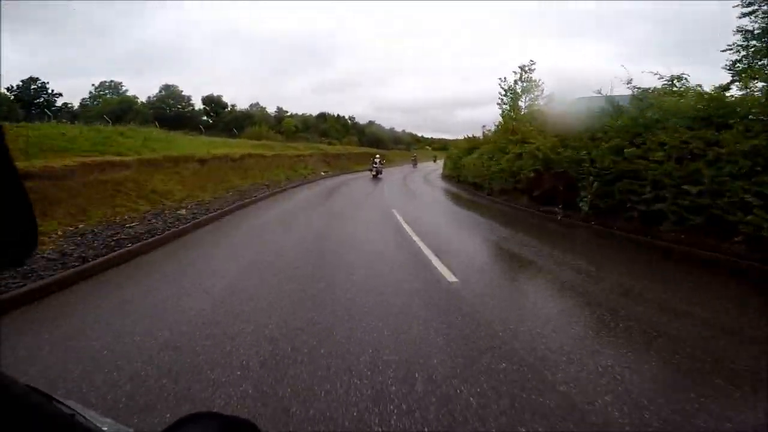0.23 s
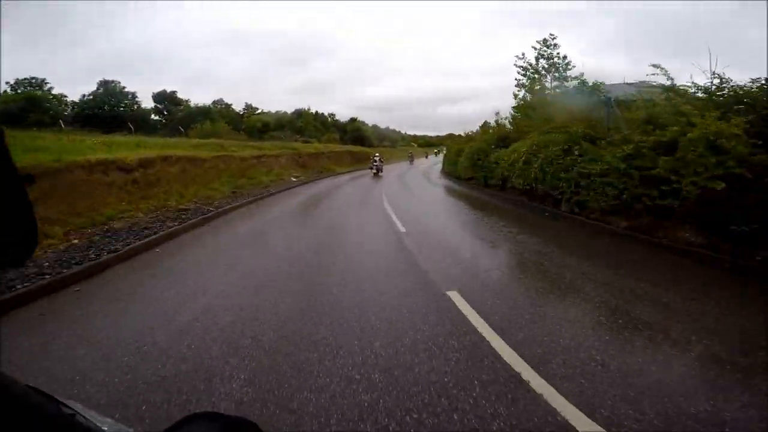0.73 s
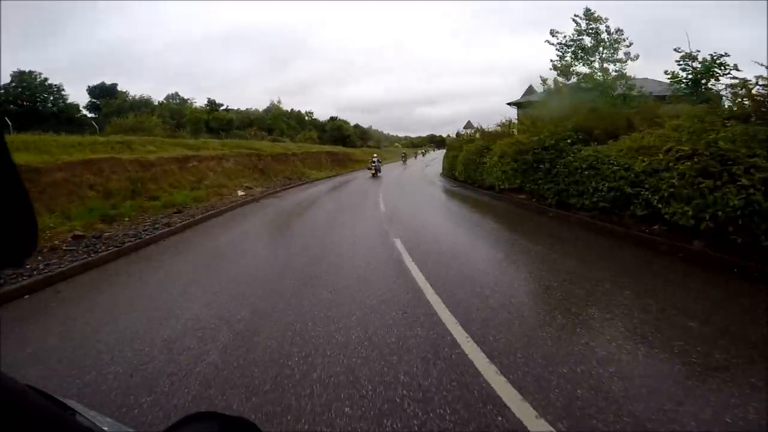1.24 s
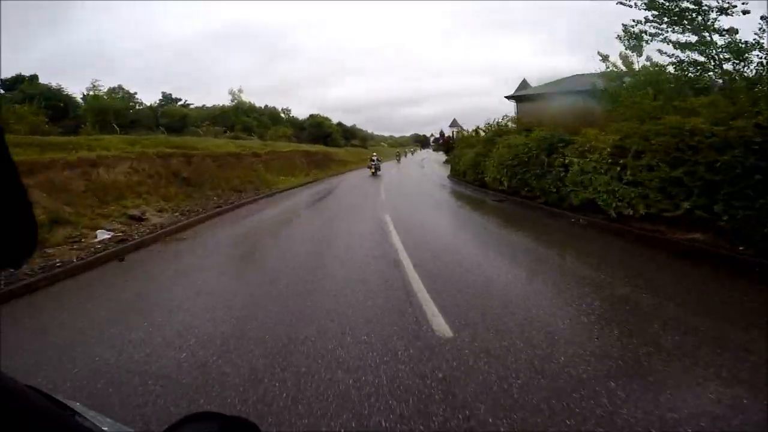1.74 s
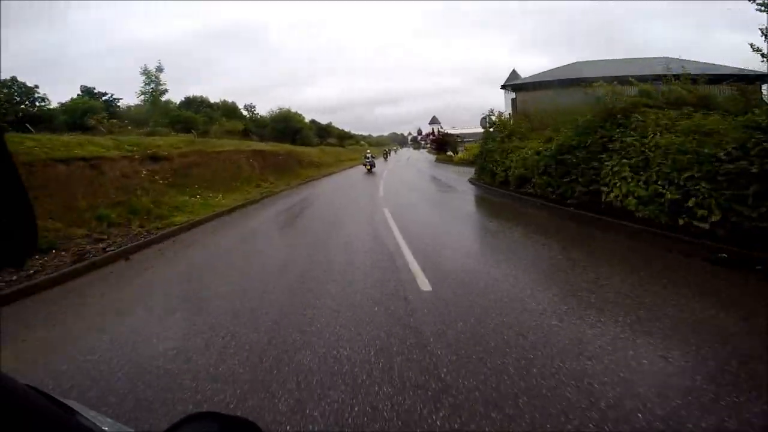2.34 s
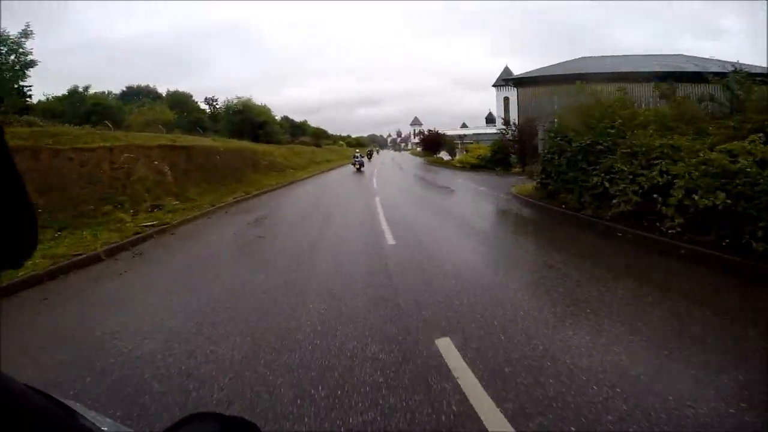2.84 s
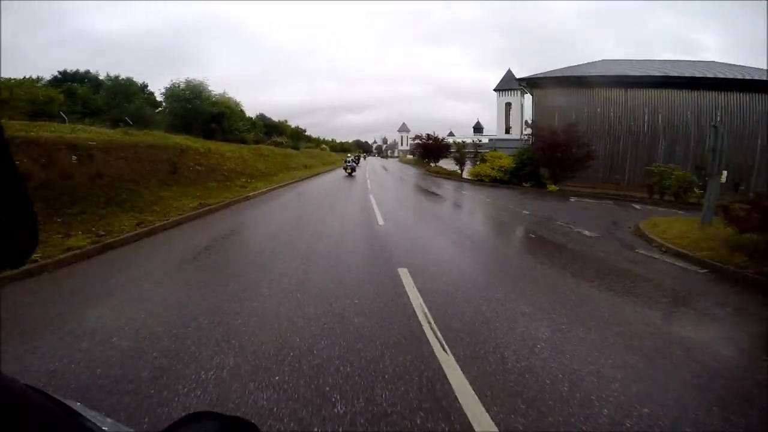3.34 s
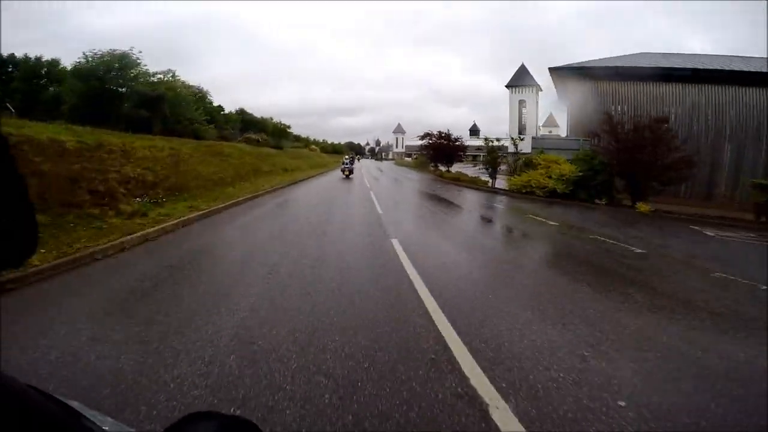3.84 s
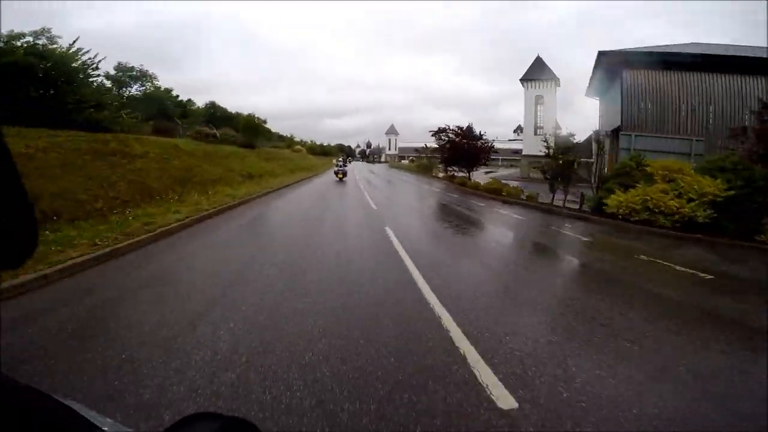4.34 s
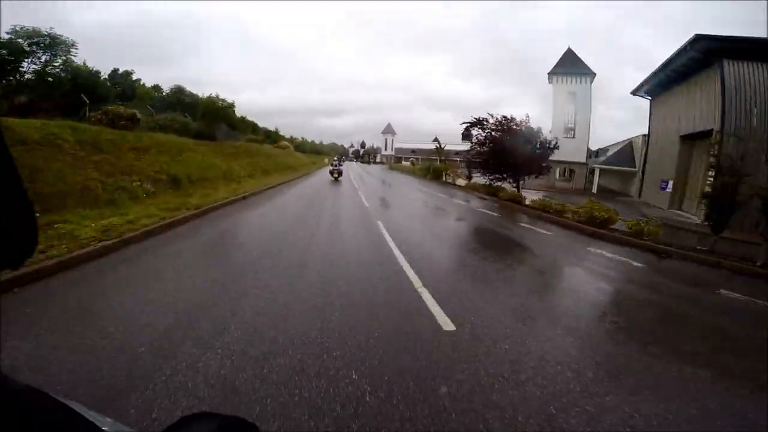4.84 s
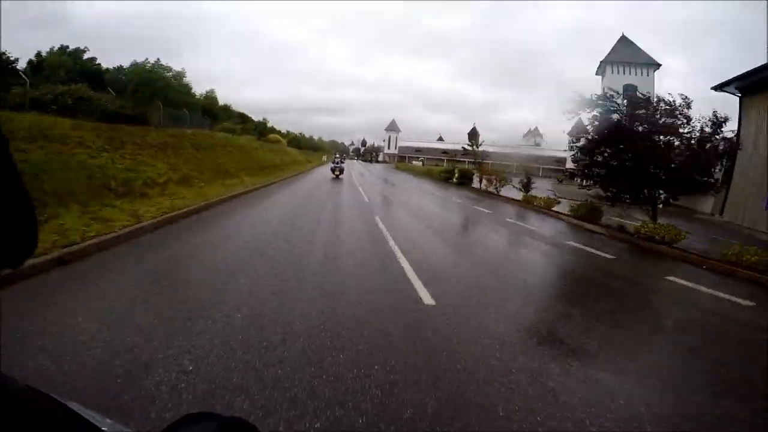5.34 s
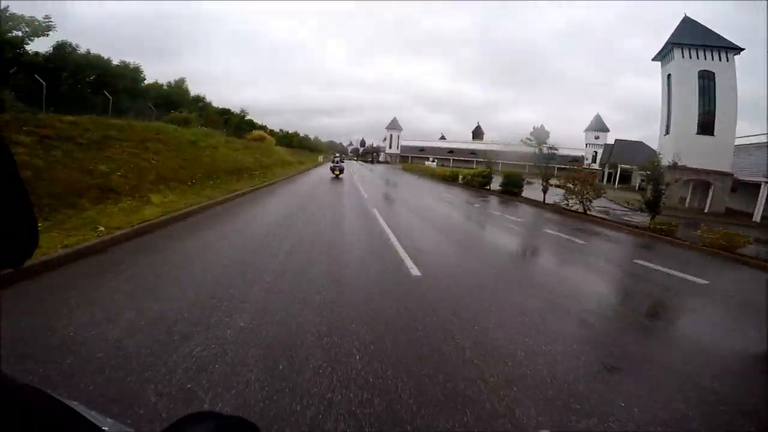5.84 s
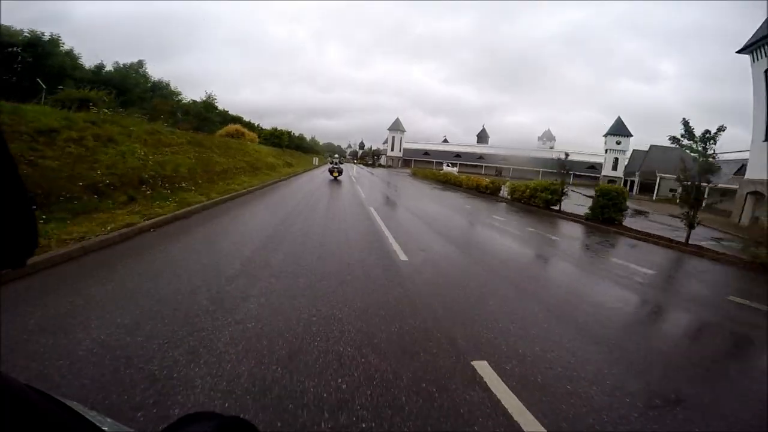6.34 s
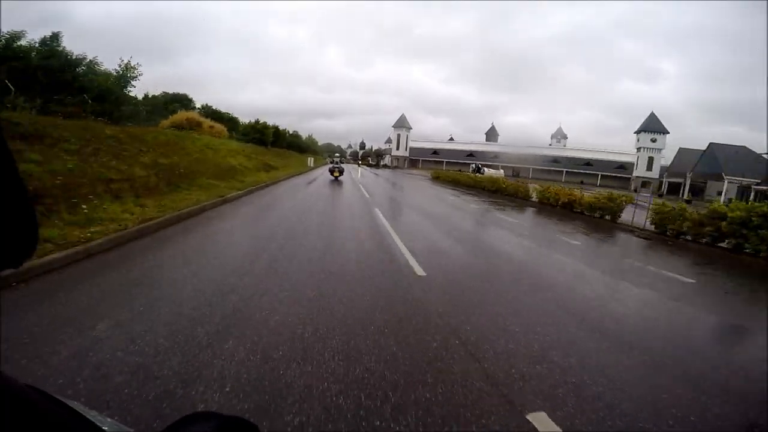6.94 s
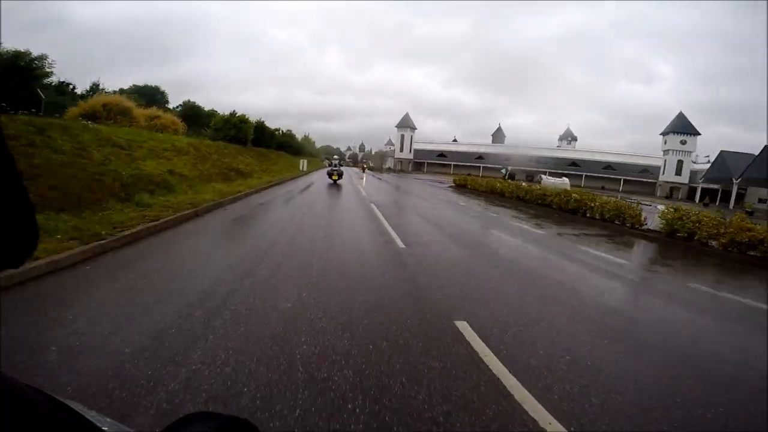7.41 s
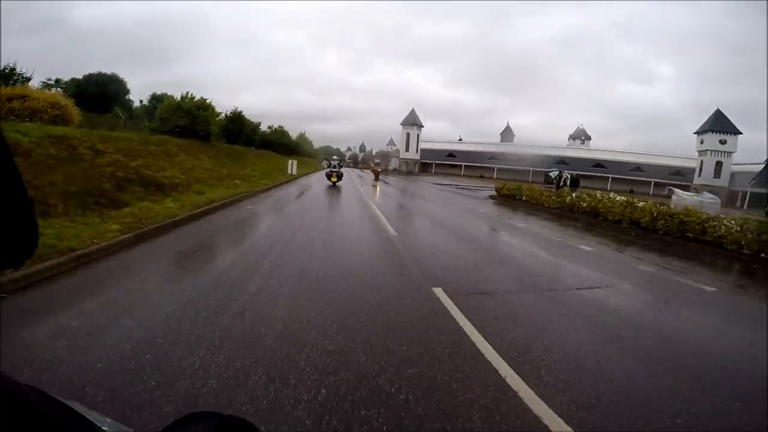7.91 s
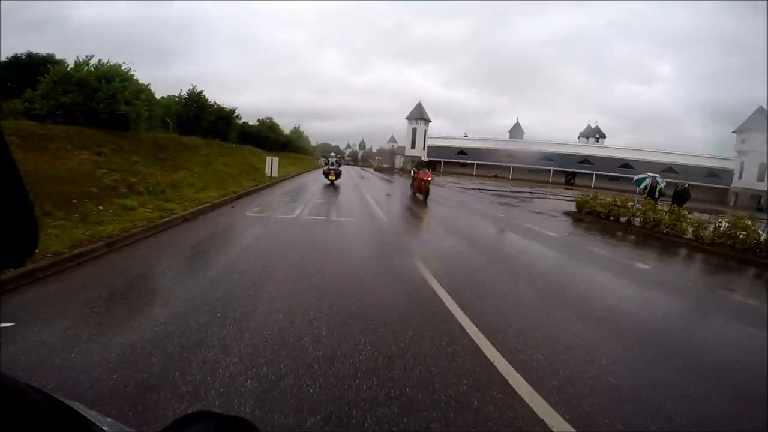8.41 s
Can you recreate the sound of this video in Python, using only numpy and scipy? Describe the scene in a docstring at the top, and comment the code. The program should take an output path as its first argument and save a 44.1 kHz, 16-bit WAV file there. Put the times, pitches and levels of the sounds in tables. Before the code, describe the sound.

A motorcycle rides a wet road, heard through a closed housing: throbbing engine, ringing gear whine, tyre spray, low rumble and ticking drops.

```python
"""A motorcycle on a wet road, taken by one microphone in a closed housing fixed to the bike. From the start the
frame shakes hard: crank orders throb in the mount, gear teeth whine, road buzz and fluctuating tyre spray ring
the housing, fine mist hisses, wind rumbles underneath and drops tick on the shell. Engine speed climbs from
about one second; the shaking eases towards three, as the mount begins to knock. The chain hum stands out around
four to five seconds; near the end the speed sinks and a high hiss grows."""
import sys
import numpy as np
from scipy import signal
from scipy.fft import rfft, irfft, next_fast_len
from scipy.io import wavfile
from scipy.ndimage import uniform_filter1d

SR = 44100
rng = np.random.default_rng(int(sys.argv[2]) if len(sys.argv) > 2 else 0)


def dump_mix(stems):
    """Bounce the given channels to the path in sys.argv[1] as a 16-bit WAV at rate SR."""
    frames = np.atleast_2d(stems).T  # one column per channel
    limited = np.clip(frames, -1, 1)  # hard clip at full scale
    pcm = np.round(limited * 32767).astype(np.int16)
    wavfile.write(sys.argv[1], SR, pcm)


N = 382347


def undb(db):
    """Decibels to gain."""
    return 10 ** (np.asarray(db) / 20)


def unit(x):
    """Scale to rms 1."""
    return x / np.sqrt(np.mean(np.abs(x) ** 2))


def noise():
    """White noise for the whole take."""
    return rng.standard_normal(N)


def curves(table):
    """Columns of a table, one value per sample."""
    s, *columns = np.transpose(table)
    return [np.interp(np.arange(N) / SR, s, c) for c in columns]


def band(x, lo_hz, hi_hz, order=2):
    """Butterworth band-pass."""
    return signal.sosfilt(signal.butter(order, [lo_hz, hi_hz], "bandpass", fs=SR, output="sos"), x)


def ring(x, modes):
    """Colour by steep resonances whose powers add."""
    size = next_fast_len(N)
    f = np.arange(size // 2 + 1) * SR / size + 1e-3  # the offset avoids division by zero
    power = 0
    for hz, width, db in modes:
        detuning = (f - hz * hz / f) / width
        power = power + undb(2 * db) / (1 + detuning ** 2) ** 2
    return irfft(rfft(x, size) * np.sqrt(power), size)[:N]


def walk(rate):
    """Random levels held 1 / rate seconds and slewed twice, scaled to rms 1."""
    hold = int(SR / rate)
    steps = np.repeat(rng.standard_normal(N // hold + 1), hold)
    return unit(uniform_filter1d(uniform_filter1d(steps, hold), hold)[:N])


def even(x):
    """Divide out swells slower than a quarter second."""
    return x / np.sqrt(uniform_filter1d(x ** 2, size=SR // 4) + 1e-12)


def shaken(levels_db, shake):
    """Level between calm and hardest shaking of the frame."""
    calm_db, hardest_db = levels_db
    return calm_db + (hardest_db - calm_db) * shake


# The ride: (time [s], twice the crank rate before smoothing [Hz], mean crank throb through the mount [dB],
# how hard the frame shakes [0-1])
RIDE = [(0, 56.05, -20, 0.84), (.6, 55.67, -17.5, 0.93), (1.2, 56.83, -22, 1.), (1.8, 58.13, -15.5, 1),
        (2.3, 60.29, -14, 0.94), (2.7, 61.16, -13.5, 0.44), (3.2, 62.97, -14.5, 0), (3.6, 64.44, -13, 0.22),
        (3.79, 64.6, -13.5, 0.58), (4.0, 65.8, -16.5, .25), (4.6, 68.17, -14, 0.2),
        (5.3, 70.05, -13.5, 0.24), (6.1, 70.36, -13.5, 0.29), (6.9, 70.76, -15.5, 0.13),
        (7.4, 69.98, -14.5, 0.24), (8.0, 68.09, -14.5, 0.04), (8.67, 65.5, -13.5, 0.21)]


def ride():
    """Crank turns, second-order rate, throb level and shaking; the flywheel smooths every change of speed."""
    second_hz, throb_db, shake = curves(RIDE)
    second_hz = uniform_filter1d(second_hz, size=SR // 2)
    turns = np.cumsum(second_hz / 2) / SR
    return turns, second_hz, throb_db, shake


# Other crank orders: (multiple of crank rate, level against UPPER_DB [dB])
CRANK_ORDERS = [(1.498, 7.5), (2.501, 4), (3.001, 2.5), (3.5, -1), (4, -2.5), (4.5, -1.5), (5.498, -3),
                (6.3, -7.5), (7, -8)]
SECOND_DB, UPPER_DB = (-29.5, -20.5), (-45, -35)  # mean level [dB]: (calm, hardest shaking)


def engine(turns, throb_db, shake):
    """The crank shakes the mount at clean orders, each wavering in level at random."""
    out = undb(throb_db + 1.2 * walk(7)) * np.sin(2 * np.pi * turns)
    second_gain = undb(shaken(SECOND_DB, shake) + 1.5 * walk(5))
    out = out + second_gain * np.sin(4 * np.pi * turns + 1.49)
    for multiple, db in CRANK_ORDERS:
        gain = undb(shaken(UPPER_DB, shake) + db + 1.1 * walk(3.0))
        out = out + gain * np.sin(2 * np.pi * (multiple * turns + rng.random()))
    return np.sqrt(2) * out  # levels are rms


CHAIN_ORDER = 7.35  # multiple of crank rate


def chain(turns, chain_db):
    """The chain hums between the crank orders, as two tones half an order apart."""
    hum = np.sin(2 * np.pi * CHAIN_ORDER * turns)
    hum = hum + 0.41 * np.sin(2 * np.pi * (CHAIN_ORDER + .5) * turns)
    return np.sqrt(2) * undb(chain_db) * hum


# Gear load beats: (multiple of crank rate, depth at full torque ripple [0-1])
LOAD_BEATS = [(.59, .45), (.5, .2), (1.18, .1), (2.0, .18), (2.6, .12), (3.0, .12)]


def gear_load(turns, ripple):
    """Tooth load about its mean swells in step with the shafts and the firing."""
    swing = 0
    for multiple, depth in LOAD_BEATS:
        swing = swing + depth * np.sin(2 * np.pi * (multiple * turns + rng.random()))
    return ripple * swing


def whine(angle, teeth, spread_hz, steady):
    """Tooth rate smeared by backlash: a tone whose phase wanders, with a share of quick random amplitude."""
    chance = noise() + 1j * noise()
    smear = unit(signal.lfilter([1], [1, -np.exp(-2 * np.pi * spread_hz / SR)], chance))
    smear = smear / np.abs(smear) ** np.clip(steady, 0, 1)  # steady 1 leaves only the phase to wander
    return unit(np.real(smear * np.exp(2j * np.pi * teeth * angle)))


MESH_ORDER = 44.1  # tooth rate as a multiple of crank rate
TWIST = 0.027  # shaft wind-up at double load, before smoothing [turns]
WHINE_DB, WHINE_DB_PER_HZ, CRUISE_HZ = -21.5, 0.3254, 64.7  # whine level at cruise, and its growth with speed
# Housing modes, rung by gears and road: (centre [Hz], width [Hz], level [dB])
HOUSING_MODES = [(494.5, 160, -13.5), (618, 50, -11.5), (851, 192, -10), (1035, 98, -8.5), (1231, 68, -8.5),
                 (1431, 232, 0.5), (1529, 273, -1), (1707, 170, -1), (1945, 200, -14), (2247, 150, -15),
                 (2630, 230, -19.5), (2985, 230, -25.5), (3656, 680, -30.5), (4930, 620, -33.5),
                 (5480, 330, -34.5), (6770, 1100, -41.5), (9400, 1800, -52.5), (12500, 3000, -59.5)]


def gears(turns, second_hz, swing, load, overtone_db):
    """Gear teeth whine into the housing, louder with load and with engine speed."""
    # the shafts wind up under load, so each swell of the whine chirps upward
    angle = turns - TWIST * uniform_filter1d(swing, size=SR // 70)
    teeth = whine(angle, MESH_ORDER, 22.0, 0.5) * load ** 1.14
    # the overtone speaks mostly while the teeth bear hard
    overtone = whine(angle, 2 * MESH_ORDER, 30.0, 0.19) * load ** 2.06
    teeth = teeth + undb(overtone_db) * overtone
    level_db = WHINE_DB + WHINE_DB_PER_HZ * (second_hz - CRUISE_HZ) + 1.5 * walk(9)
    return even(ring(teeth, HOUSING_MODES)) * undb(level_db)


# Drive train: (time [s], chain hum [dB], torque ripple [0-1], gear overtone against the tooth tone [dB])
DRIVE_TRAIN = [(0, -51, 0.79, -0.5), (2.6, -52.5, 0.97, 1.5), (3.6, -42.5, 0.9, 4.5), (4.5, -42, .8, 1.5),
               (5.6, -42, 0.8, -0.5), (6.3, -54, .75, -3.5), (7.2, -49.5, 0.8, -4), (7.8, -45, .3, 0),
               (8.67, -46, 0.2, 3)]


def drive_train(turns, second_hz):
    """Chain hum and gear whine, with the tooth load that also works on the road buzz."""
    chain_db, ripple, overtone_db = curves(DRIVE_TRAIN)
    swing = gear_load(turns, ripple)
    load = np.maximum(1 + swing, .05)
    sound = chain(turns, chain_db) + gears(turns, second_hz, swing, load, overtone_db)
    return sound, load


BUZZ_DB = (-30.5, -27.5)  # 1650-1900 Hz level at WET_DB of spray [dB]: (calm, hardest shaking)
WET_DB, BUZZ_PER_SPRAY_DB = -36.5, 0.06  # the buzz gains this many dB for each dB of spray over WET_DB


def road_buzz(load, shake, spray_db):
    """Random road force rings the housing, swelling with tooth load, shaking and spray."""
    force = noise() * load ** 0.34 * undb(1.0 * walk(25))
    buzz = ring(force, HOUSING_MODES)
    buzz = buzz / np.std(band(buzz, 1650, 1900))
    return buzz * undb(shaken(BUZZ_DB, shake) + BUZZ_PER_SPRAY_DB * (spray_db - WET_DB))


# The same shell as spray from outside excites it: (centre [Hz], width [Hz], level [dB])
SHELL_MODES = [(2402, 456, 18), (2609, 83, -0.5), (3500, 760, -1), (5000, 400, -18), (5490, 350, -18.5),
               (6830, 500, -33)]
# Tyre spray on the housing: (time [s], level [dB])
TYRE_SPRAY = [(0, -40), (1.05, -46), (1.28, -34), (1.7, -45), (1.86, -29), (2.1, -32), (2.28, -36),
              (2.44, -32.5), (2.8, -28), (3.05, -38.5), (3.7, -37.5), (4.05, -44), (4.2, -29), (4.7, -28),
              (5.0, -27.5), (5.25, -33), (5.45, -29), (5.7, -35), (6.05, -29.5), (6.45, -29), (7.1, -35),
              (8.05, -36), (8.22, -28), (8.67, -36)]


def tyre_spray():
    """Fluctuating noise of water rings the shell; its level curve is returned too."""
    spray_db = curves(TYRE_SPRAY)[0]
    spray = unit(ring(noise() * undb(1.64 * walk(22)), SHELL_MODES))
    return spray * undb(spray_db), spray_db


# High hiss, fine spray at first and rising steeply at the end: (time [s], mean level [dB])
FINE_SPRAY = [(0.0, -66.5), (2.1, -72.5), (3.94, -73.5), (4.61, -70), (6.52, -69.5), (6.9, -74.5),
              (8.11, -67), (8.67, -56)]


def mist():
    """Fine spray hisses as wavering high noise."""
    mist_db = curves(FINE_SPRAY)[0]
    return unit(band(noise(), 5600, 12500)) * undb(mist_db + 1.5 * walk(30))


WIND_DB = (-36.5, -31)  # mean 90-240 Hz level [dB]: (calm, hardest shaking)
# Wind on the housing: (centre [Hz], width [Hz], level [dB])
WIND_BANDS = [(58, 56, 3), (118, 54, -0.5), (218, 150, -12.5), (338, 380, -14)]


def wind(shake):
    """Low rumble of air over the housing, as noise in broad low bands."""
    rumble = ring(noise(), WIND_BANDS)
    rumble = rumble / np.std(band(rumble, 90, 240))
    return rumble * undb(shaken(WIND_DB, shake) + 1.2 * walk(6))


# The mount on its rubber: (centre [Hz], width [Hz], level [dB])
MOUNT_SWAY = [(30.34, 4.2, 1), (20.8, 7.1, -7)]


def sway():
    """Random force keeps the mount swaying at its low resonances."""
    return unit(ring(noise(), MOUNT_SWAY)) * undb(-19)


# Loud drops on the shell: (time [s], peak of the bright part [dB], duller part against it [dB])
LOUD_DROPS = [(0.2467, -30, -9), (0.2683, -33.5, -3), (0.5645, -28.5, 6), (0.599, -24, 5),
              (0.9901, -34.5, -1), (1.0176, -27, 5), (1.1627, -41.5, 4), (1.3099, -41.5, 5),
              (1.4691, -41.5, 17), (3.0761, -40.5, 0), (3.9005, -43, 0), (4.6833, -32, 7), (5.916, -37, 6),
              (5.9729, -39, -2), (6.212, -40, 3), (7.2639, -29, -8), (7.4342, -38, 3), (7.7183, -24, -3),
              (7.8088, -41.5, 1), (8.1104, -39, -6), (8.4216, -28.5, -5), (8.484, -30, -3),
              (8.5063, -28, -3)]


def drops():
    """Each drop is a decaying noise click, bright and dull; many faint ones fall between the loud ones."""
    length = 88  # samples, 2 ms
    out = np.zeros(N + length)
    chance = np.c_[rng.random(200), rng.exponential(size=200)]
    faint = [(u * N / SR, -53.5 + 3.4 * min(e, 3.5), -2.0) for u, e in chance]
    bursts = rng.standard_normal((300, length)) * np.exp(-np.arange(length) / 21.0)
    bright = band(bursts, 5100, 11000, order=1)
    bright = bright / np.abs(bright).max(axis=1, keepdims=True)
    dull = band(bursts, 2700, 6500)
    dull = dull / np.abs(dull).max(axis=1, keepdims=True)
    for (s, db, dull_db), tick, tap in zip(faint + list(LOUD_DROPS), bright, dull):
        i = int(s * SR)
        out[i:i + length] += undb(db) * (tick + undb(dull_db) * tap)
    return out[:N]


KNOCK_HZ = 780
# Mount knocks: (time [s], level [dB])
MOUNT_KNOCKS = [(2.819, -22.5), (2.885, -19.5), (2.945, -27), (3.045, -16), (3.556, -16), (3.683, -18),
                (3.805, -13), (3.853, -19), (3.903, -26), (3.953, -24), (3.993, -21), (4.503, -20.5),
                (4.738, -19.5), (5.057, -18), (8.284, -20)]


def knocks():
    """The mount knocks with about one cycle of a sine under a bell-shaped envelope."""
    out = np.zeros(N)
    t = np.arange(-120, 120) / SR
    knock = np.sin(2 * np.pi * KNOCK_HZ * t) * np.exp(-(t * KNOCK_HZ * 1.1) ** 2)
    for s, db in MOUNT_KNOCKS:
        i = int(s * SR)
        out[i:i + 240] += undb(db) * knock
    return out


def scene():
    """All vibration meets in the housing, at one microphone."""
    turns, second_hz, throb_db, shake = ride()
    crank = engine(turns, throb_db, shake)
    drive, load = drive_train(turns, second_hz)
    spray, spray_db = tyre_spray()
    buzz = road_buzz(load, shake, spray_db)
    rumble = wind(shake) + sway()
    return (crank + drive + buzz + spray + mist() + rumble + drops() + knocks())[None]


def record(dry):
    """The microphone rounds the loudest peaks; the recorder cuts the top above 15.2 kHz."""
    rounded = np.tanh(0.71 * dry) / 0.7
    top_cut = signal.ellip(8, .2, 70, 15200, fs=SR, output="sos")
    return signal.sosfilt(top_cut, rounded)


dry = scene()
out = record(dry)
dump_mix(out)
```